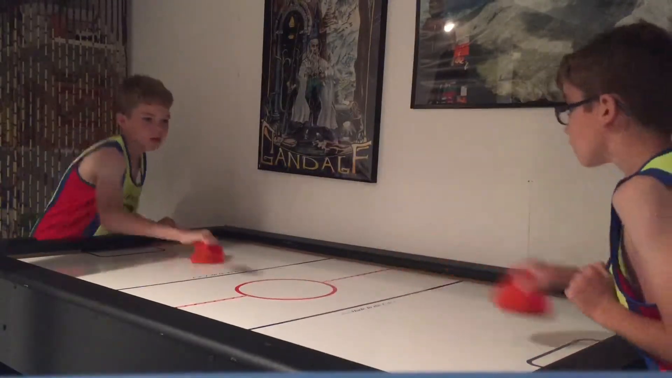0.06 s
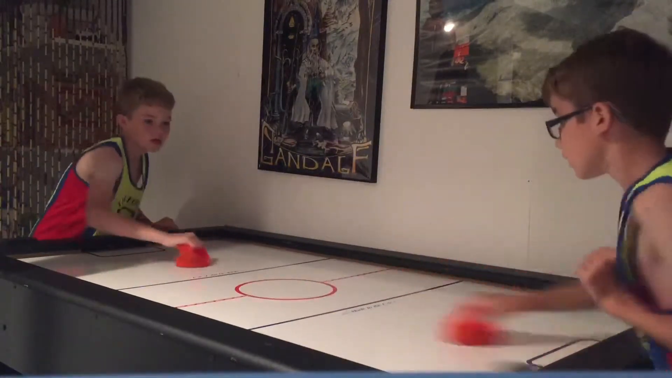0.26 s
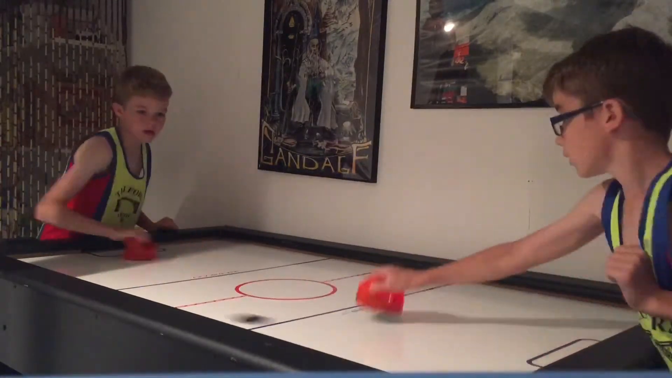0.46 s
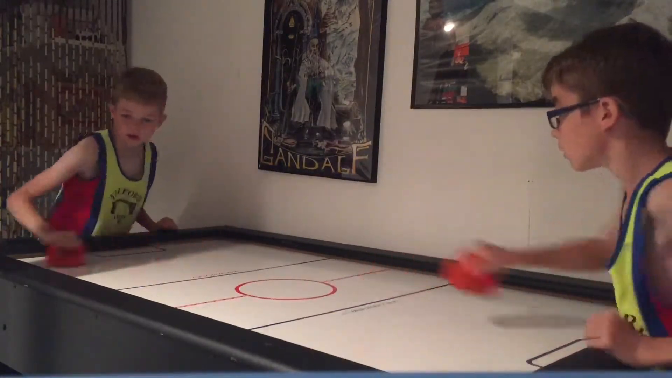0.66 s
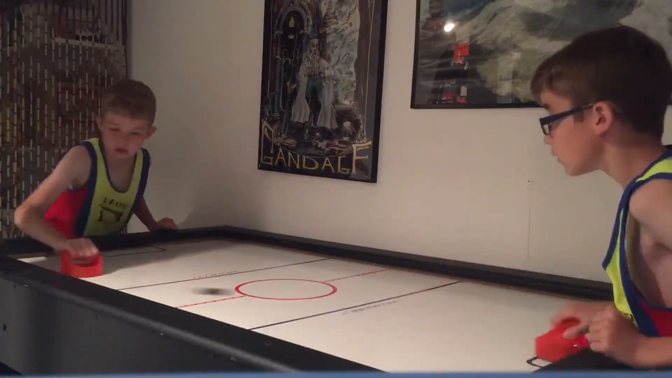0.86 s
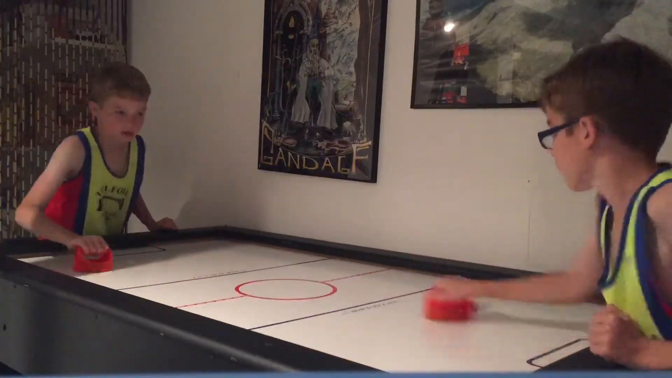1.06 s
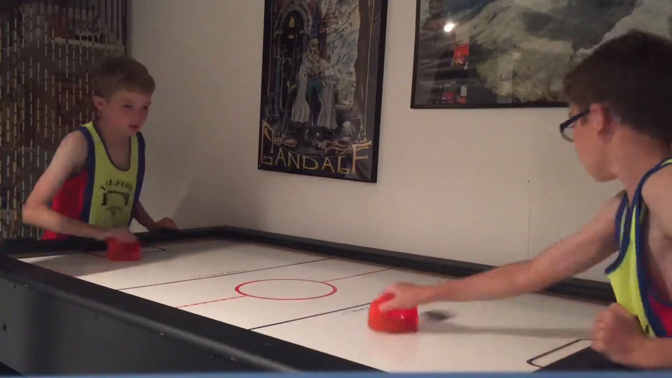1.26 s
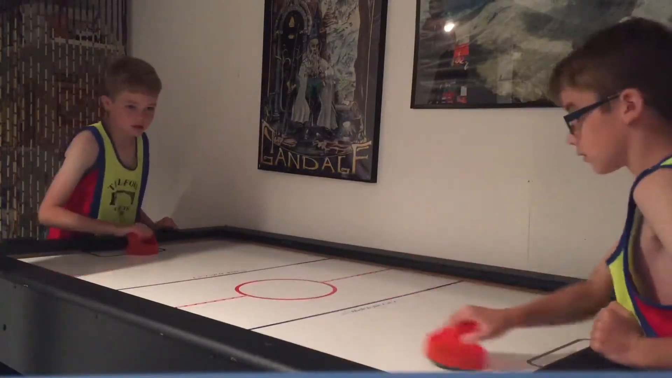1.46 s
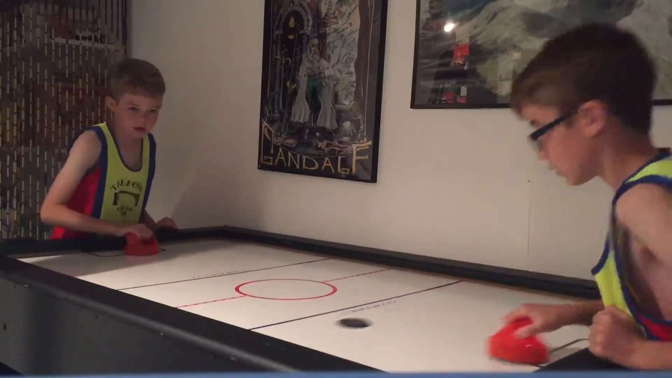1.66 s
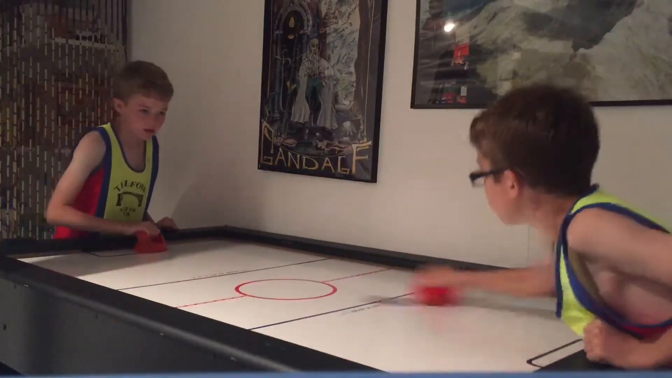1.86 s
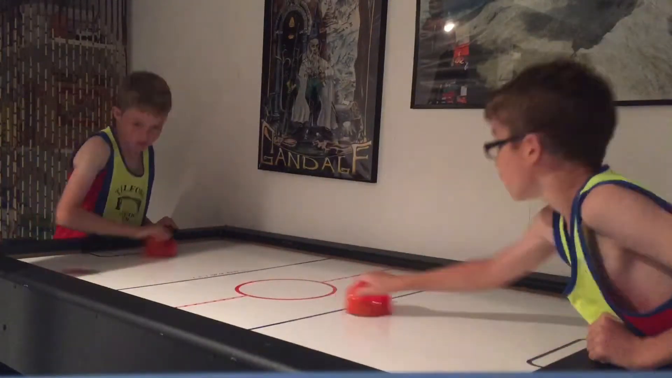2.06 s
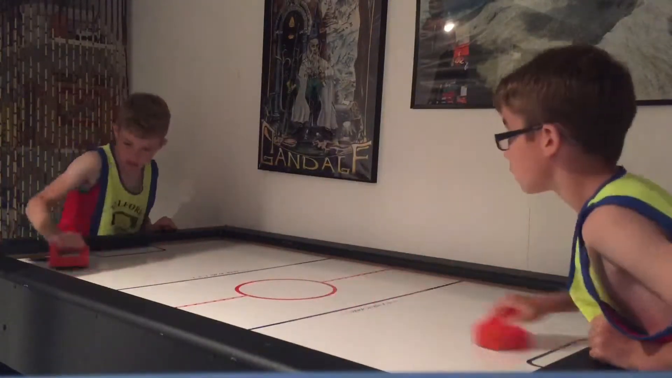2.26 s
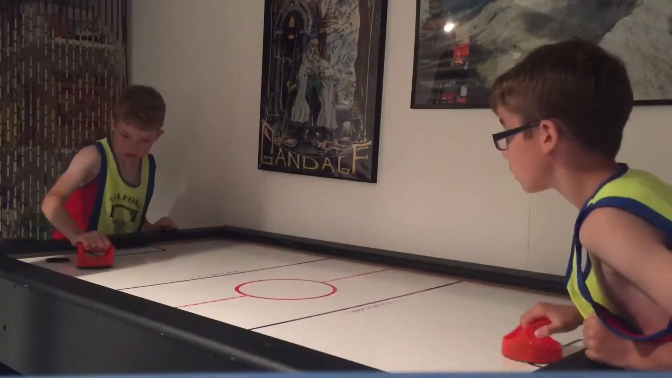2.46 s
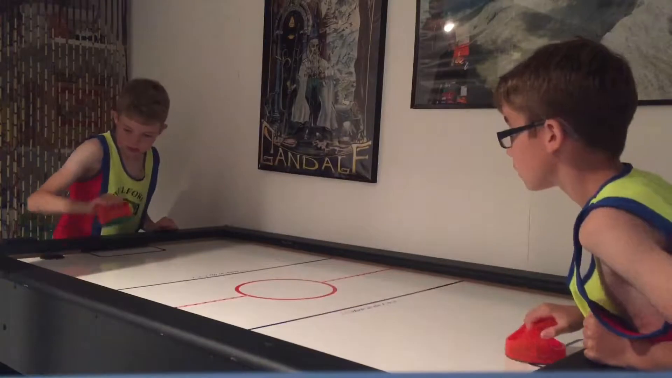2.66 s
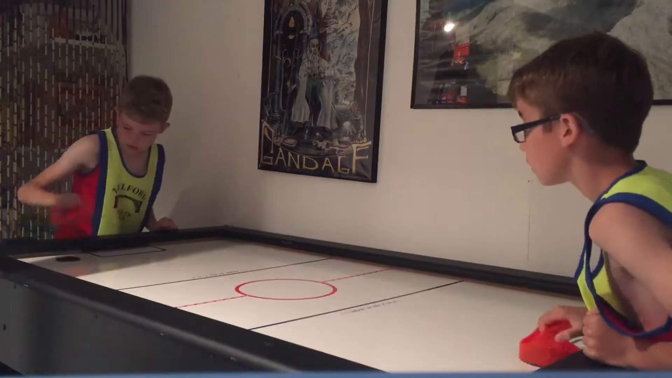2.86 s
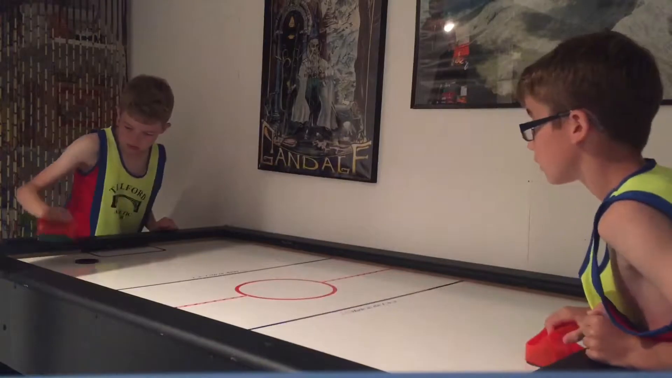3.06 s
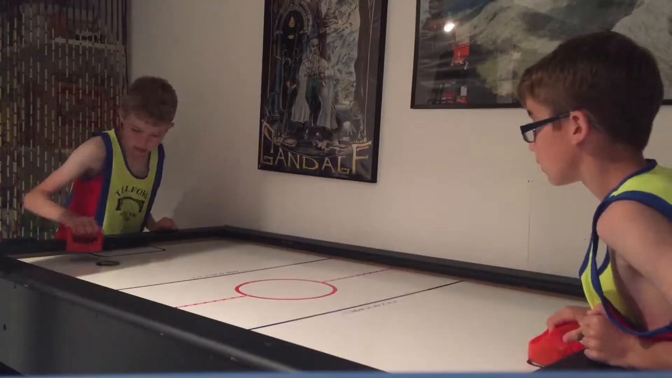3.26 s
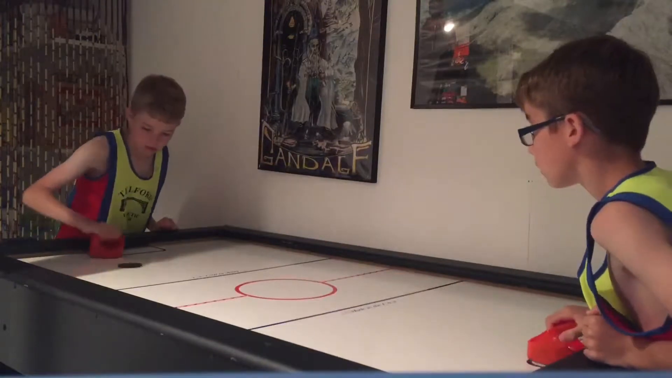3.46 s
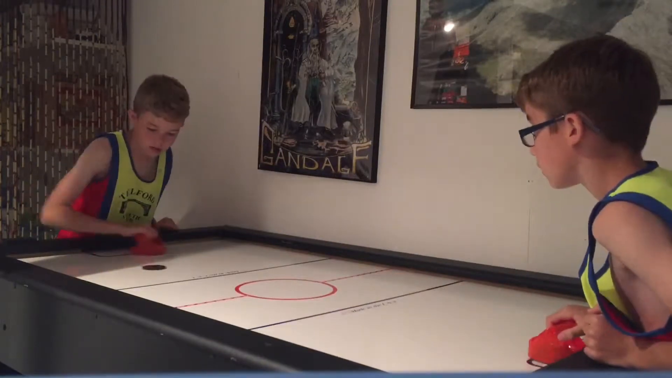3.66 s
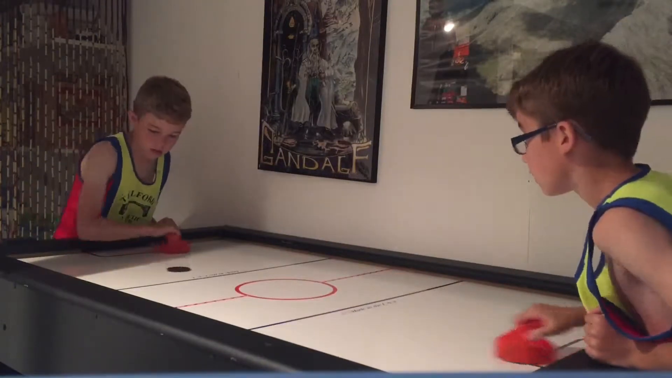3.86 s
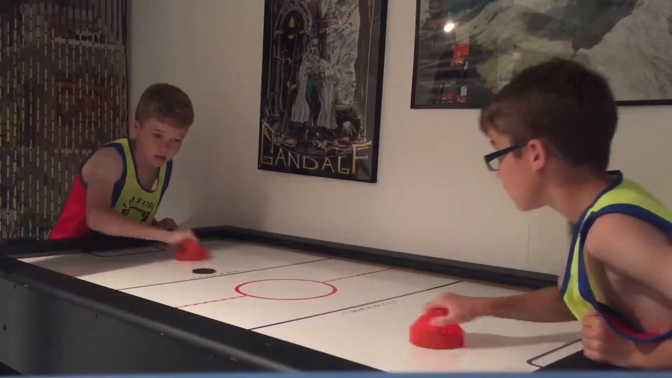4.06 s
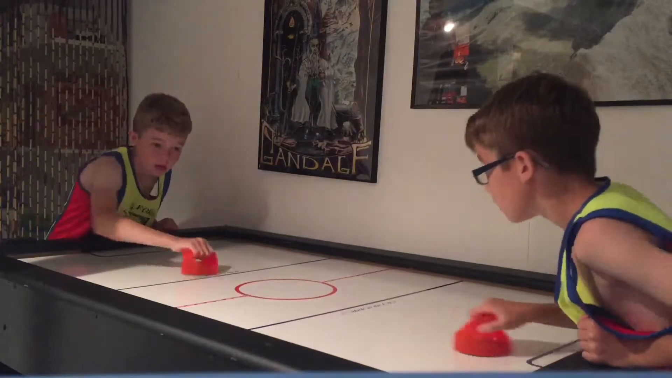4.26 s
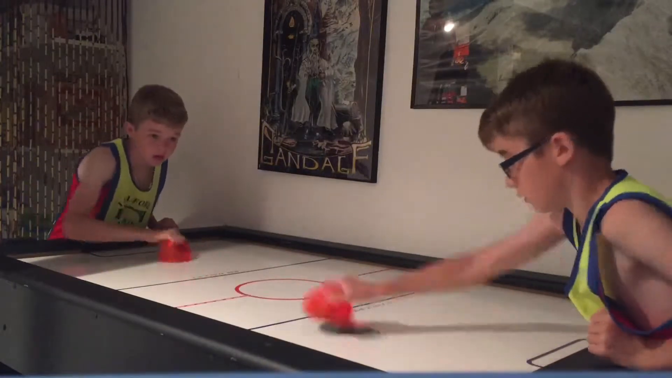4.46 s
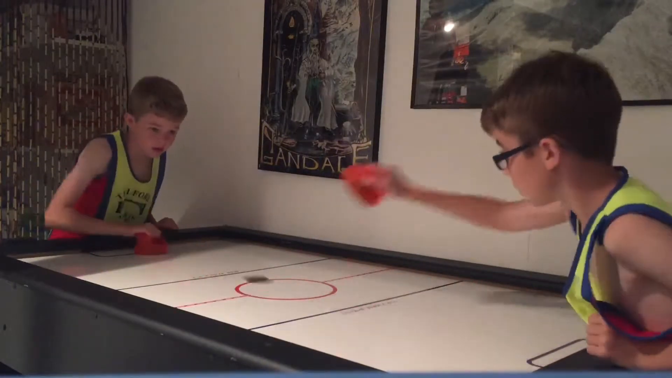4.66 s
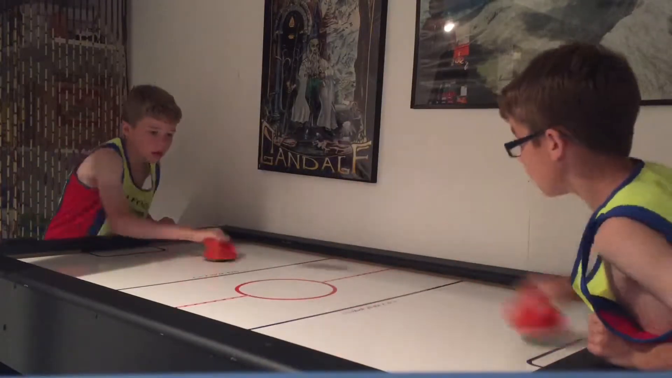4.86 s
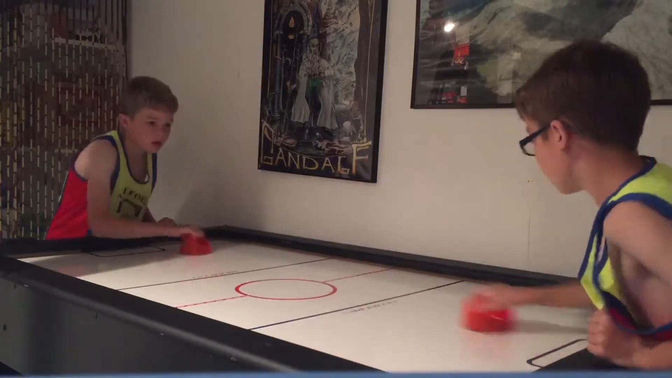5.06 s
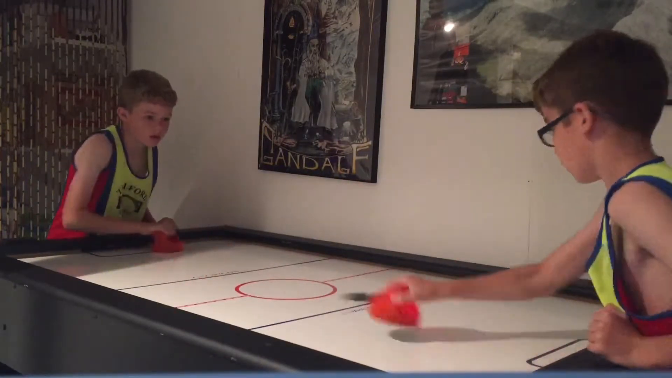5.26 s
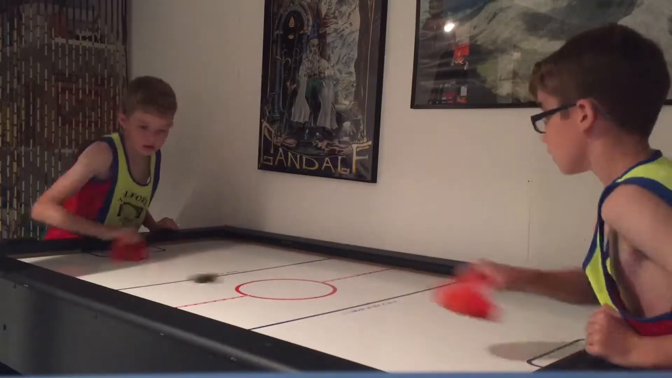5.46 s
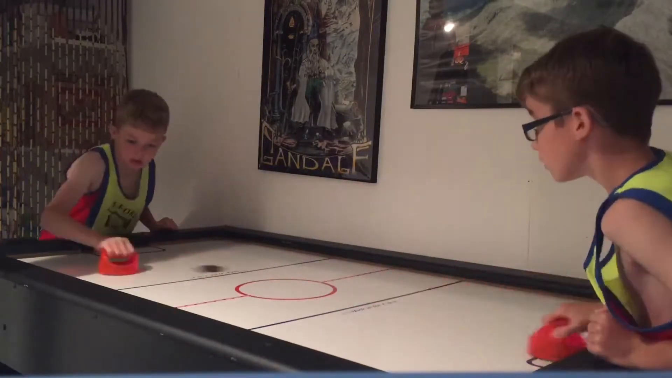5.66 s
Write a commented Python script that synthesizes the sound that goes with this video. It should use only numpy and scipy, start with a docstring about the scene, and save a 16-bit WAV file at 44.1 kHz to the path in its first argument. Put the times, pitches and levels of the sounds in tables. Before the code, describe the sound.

Fast air hockey rally: bright plastic cracks and duller rail clacks over steady blower rush, a quieter pause, then a second burst with close clatter.

```python
"""The fading tail of a rail clack opens the scene; then bright cracks of mallet on puck alternate with
duller clacks of the air hockey puck off the rails. The puck rattles lightly in the goal and is served
again after a pause. The hollow table top thumps, the near mallet ticks and rings close by, and plastic
hisses faintly over the laminate. All contacts are noise shaped by spectra and damped modes, heard from
beside the table in a hard-walled room at home, over the blower's shaped noise and wavering tones."""
import sys
import numpy as np
from scipy import signal
from scipy.fft import rfft, irfft
from scipy.io import wavfile
from scipy.ndimage import uniform_filter1d

SR = 44100
rng = np.random.default_rng(int(sys.argv[2]) if len(sys.argv) > 2 else 0)


def generate_wav(signal):
    """Clip the signal to [-1, 1] and save it as 16-bit WAV at the path in sys.argv[1]."""
    frames = np.transpose(np.atleast_2d(signal))
    scaled = np.clip(frames, -1, 1) * 32767
    pcm = np.round(scaled).astype(np.int16)
    wavfile.write(sys.argv[1], SR, pcm)


N = 251804

# Bright plastic hits: mallet on puck, and light rattles of the puck in the goal. Each row: start in
# seconds, strength in dB, brightness in dB, cabinet knock in dB over the table's drumming.
BRIGHT_HITS = [ (0.105, -15.5, -2.5, -13), (0.791, -15.5, -2, 3), (1.128, -25, -9.5, 3.5),
               (1.921, -23, -2, 8), (2.266, -25.5, 2.5, -1), (2.412, -30, -5, -14), (3.703, -69, -5, -2),
               (4.185, -20, 0.5, -11), (4.8795, -14.5, -2.5, -8.5), (4.985, -25, -3, 4.5)]
# The puck meets rails and goal. Each row: start in seconds (negative: only the tail is heard),
# strength in dB, fullness in dB, direct path in dB.
RAIL_HITS = [ (-0.300, -19, 10, 0), (0.3198, -12.5, 1.5, -1), (0.771, -29.5, 12, -23),
             (1.188, -13, 2.5, 1.5), (1.541, -18.5, 2.5, 0.5), (2.198, -19, -1, 0), (2.208, -15, -5, -1.5),
             (2.3189, -21, -1.5, 1), (2.698, -42, 8, 2.5), (4.347, -17.5, 5, -21), (4.401, -15, -3, 0),
             (5.107, -15, 2.5, -7)]
# A mallet is set down on the table top. Each row: start in seconds, low drumming in dB,
# cabinet knock in dB over the drumming.
LANDINGS = [(0.219, -25, -10), (0.83, -26.5, 5.5), (3.45, -48, -13), (3.69, -45, -6), (4.966, -25.5, 4),
            (5.628, -23.5, -1.5), (5.658, -25, 5.5)]
# The near mallet clatters and rings. Each row: start in seconds, strength in dB, brightness in dB.
CLATTERS = [(1.129, -27, -13.5), (4.982, -22.5, -25), (5.079, -35, -1), (5.086, -26, -10),
            (5.108, -14, -10.5), (5.222, -38.5, 5.5), (5.449, -31.5, -11), (5.561, -31, -7),
            (5.656, -20.5, -7.5)]
# Strokes of a mallet over the table top. Each row: time of full speed in seconds, level in dB.
STROKES = [(0.1, -54.5), (4.15, -57.5), (5.2, -30), (5.48, -39)]

# Relative spectra of what each contact radiates. Each row: frequency in Hz, density in dB per Hz.
BRIGHT_COLOUR = [(60, -17), (300, -20), (700, -13), (1050, -6), (1500, -4.5), (2100, -4), (2700, -5),
                 (3600, -5.5), (4800, -12), (6600, -9), (8200, -15.5), (10000, -11.5), (12000, -15),
                 (15500, -15)]
RAIL_COLOUR = [(50, -45), (130, -32), (250, -16), (420, -8.5), (640, 0), (850, -3.5), (1500, -4),
               (2300, -2), (3000, -8), (3900, -17.5), (5000, -26), (6600, -29), (8500, -31.5), (15500, -39)]
THUMP_COLOUR = [(30, -59.5), (50, -21), (75, 7.5), (125, -3), (180, 7), (370, 0.5), (620, -14),
                (1200, -25.5), (4000, -42)]
KNOCK_COLOUR = [(60, -35.5), (200, -3), (340, 1.5), (630, -2.5), (900, -4), (1500, -13.5), (4000, -35)]
SCUFF_COLOUR = [(300, -24), (1500, -2), (3900, -6), (4800, -1), (6500, 1.5), (8000, -9.5), (10600, -2),
                (12000, -18.5), (15500, -7)]
# Relative spectrum of the blower's rushing air. Each row: frequency in Hz, density in dB per Hz.
AIR_RUSH_COLOUR = [(25, -38), (45, -19.5), (65, -5.5), (105, -4.5), (135, -18), (180, -8.5), (260, -15),
                   (500, -7), (900, -2.5), (1250, -13), (3000, -19), (5000, -33), (10000, -43),
                   (16000, -62.5)]
# Blower motor and fan. Each row: frequency in Hz, level in dB rms.
MOTOR_HUM = [(103, -56), (311, -64), (362, -59), (572, -58), (694, -56.5), (851, -54), (940, -54.5)]

# Hard plastic of puck and mallets. Each row: frequency in Hz, width in Hz,
# level in dB relative to the broad clack.
PLASTIC_MODES = [(1060, 45, -3), (2140, 50, -2), (2700, 60, -7), (3200, 90, -5), (3840, 70, 2),
                 (6480, 120, 4), (6950, 80, -1), (9780, 160, 4), (9980, 60, 2), (13400, 260, 2),
                 (14950, 300, 2)]
# Hollow cup of the near mallet. Each row: frequency in Hz, width in Hz, relative level in dB.
CUP_MODES = [(1715, 45, -10), (2850, 90, -15), (3390, 50, -14), (3800, 60, 1), (6490, 90, -8),
             (6880, 70, -18), (9450, 170, -22), (9750, 150, -21), (10680, 110, -20), (13250, 170, -26),
             (14850, 250, -28)]
# Hollow table top. Each row: frequency in Hz, relative level in dB, 60 dB decay time in seconds.
TABLE_MODES = [(65.4, -9.5, 0.47), (83.2, -12, 0.65), (161, -9, 0.85), (195.5, -1.5, 0.46),
               (237.4, -11, 0.6), (306, -3.5, 0.5), (363, 0, 0.28), (455.3, -4, 0.22), (610, -20, 1)]
# The room. Each row: frequency in Hz, 60 dB decay time in seconds.
ROOM_T60 = [(80, 0.72), (200, 0.77), (530, 0.79), (1400, 0.88), (3500, 0.95), (6500, 0.72), (10000, 0.57),
            (15000, 0.32)]

# Every bright hit also drives the table top, a hard one far more than a light one.
FULL_HIT_DB, FULL_DRUM_DB = -15.5, -21
DRUM_GROWTH = 1.26  # dB of drumming per dB of hit
DRUM_LAG_S = 0.006
# A fast puck gives the full treble; below that strength the contact is longer and duller.
FAST_PUCK_DB, FAST_TREBLE_DB = -18.5, 4.5
DULLING = 2.1  # dB of treble setting lost per dB of strength
CLATTER_DIRECT_DB = 11  # close by, so the direct path leads the room
STROKE_RISE_DB_PER_S, STROKE_FALL_DB_PER_S = 74, 54
RUSH_DB = -42.5  # dB rms
CUTOFF_HZ = 15800

LENGTH = 2 ** 16  # samples in one contact with its room tail
AGE = np.arange(LENGTH) / SR  # seconds since the contact
HZ = np.maximum(np.arange(LENGTH // 2 + 1) * SR / LENGTH, 1)


def bright_hits(crack_db=10.5, crack_treble_db=0.5):
    """Plastic struck hard or rattled lightly: a short, bright crack rings its modes and then the room."""
    out = np.zeros(N)
    ring = plastic(PLASTIC_MODES)
    body = rms_one(causal(at_hz(BRIGHT_COLOUR, HZ)))
    crack = from_db(crack_db) * treble(crack_treble_db)
    tails = room_tails(len(BRIGHT_HITS))
    for (s, db, bright_db, _), tail in zip(BRIGHT_HITS, tails):
        early = first_arrivals(direct=4.0, swell_s=0.0053, spread_s=0.0015, linger_db=-3, linger_s=0.0039)
        colour = body * (1 + ring) * treble(bright_db) * grain(depth_db=1.0, width_hz=60)
        add(out, s, from_db(db) * irfft(colour * (crack * early + tail)))
    return out


def rails(knock_db=3.0, knock_treble_db=0.0):
    """The puck knocks on rails and goal: a duller, fuller clack, duller still when the puck is slow."""
    out = np.zeros(N)
    ring = 0.7 * plastic(PLASTIC_MODES)
    body = rms_one(causal(at_hz(RAIL_COLOUR, HZ)) * (1 + ring))
    knock = from_db(knock_db) * treble(knock_treble_db)
    tails = room_tails(len(RAIL_HITS))
    for (s, db, full_db, direct_db), tail in zip(RAIL_HITS, tails):
        bright_db = FAST_TREBLE_DB - DULLING * max(FAST_PUCK_DB - db, 0)
        early = first_arrivals(direct=9.0, swell_s=0.0039, spread_s=0.0031, linger_db=-4, linger_s=0.05)
        colour = body * bass(full_db) * treble(bright_db) * grain(depth_db=1.5, width_hz=55)
        near_sound = from_db(direct_db) * knock * early
        add(out, s, from_db(db) * irfft(colour * (near_sound + tail)))
    return out


def table_top(boom_db=-0.5, punch_db=0.0):
    """Bright hits and landing mallets make the hollow top drum, the cabinet knock and the room boom."""
    out = np.zeros(N)
    boom = from_db(boom_db) * rms_one(causal(at_hz(THUMP_COLOUR, HZ)))
    wood = rms_one(causal(at_hz(KNOCK_COLOUR, HZ)))
    blows = list(LANDINGS)
    for s, db, _, knock_db in BRIGHT_HITS:
        drum_db = FULL_DRUM_DB + DRUM_GROWTH * (db - FULL_HIT_DB)
        blows.append((s + DRUM_LAG_S, drum_db, knock_db))
    for (s, drum_db, knock_db), tail in zip(blows, room_tails(len(blows))):
        early = first_arrivals(direct=9.4, swell_s=0.0054, spread_s=0.0012, linger_db=-9, linger_s=0.038)
        cabinet = boom + from_db(knock_db) * wood * grain(depth_db=3.5, width_hz=28)
        knock = irfft(cabinet * (from_db(punch_db) * early + tail))
        add(out, s, from_db(drum_db) * (table_thump() + knock))
    return out


def table_thump(modes_db=-2.0, scatter_db=4.0):
    """The top drums in its low modes, with random strengths and signs for the place of the blow."""
    out = 0
    for hz, db, t60 in TABLE_MODES:
        level_db = modes_db + db + scatter_db * rng.standard_normal()
        strength = from_db(level_db) * rng.choice([-1, 1])
        out = out + strength * np.sin(2 * np.pi * hz * AGE) * from_db(-60 * AGE / t60)
    return out * (1 - np.exp(-AGE / 0.0018))  # soft onset


def near_mallet(tick_db=-4.5):
    """The hollow cup is jolted and rocks on its rim; each touch is a tick and a ring."""
    out = np.zeros(N)
    cup = rms_one(plastic(CUP_MODES))
    tick = from_db(tick_db) * rms_one(causal(at_hz(SCUFF_COLOUR, HZ)))
    for (s, db, bright_db), tail in zip(CLATTERS, room_tails(len(CLATTERS))):
        early = first_arrivals(direct=2.3, swell_s=0.0033, spread_s=0.00067, linger_db=-5.5, linger_s=0.023)
        colour = (cup + tick) * treble(bright_db)
        add(out, s, from_db(db) * irfft(colour * (from_db(CLATTER_DIRECT_DB) * early + tail)))
    return out


def scuffing():
    """Plastic slides on the laminate: a slightly uneven hiss swells and fades with each stroke."""
    hiss = rms_one(shaped_noise(from_db(at_hz(SCUFF_COLOUR, scene_hz()))))
    catches_db = rms_one(uniform_filter1d(rng.standard_normal(N), size=600))
    t = np.arange(N) / SR
    strokes_db = []
    for s, db in STROKES:
        drop_db = np.maximum(STROKE_RISE_DB_PER_S * (s - t), STROKE_FALL_DB_PER_S * (t - s))
        strokes_db.append(db - drop_db)
    return hiss * from_db(np.max(strokes_db, axis=0) + catches_db)


def blower(whistle_hz=8030, whistle_width_hz=110, whistle_db=-71, waver_hz=0.61):
    """Air rushes through the table, motor and fan hum, and the air holes whistle faintly."""
    hz = scene_hz()
    rush = rms_one(shaped_noise(from_db(at_hz(AIR_RUSH_COLOUR, hz))))
    # the resonance applied twice makes the whistle narrower
    whistle = rms_one(shaped_noise(resonance(hz, whistle_hz, whistle_width_hz) ** 2))
    hum = 0
    for line_hz, db in MOTOR_HUM:
        waver = waver_hz * rms_one(uniform_filter1d(rng.standard_normal(N), size=4000))
        phase = 2 * np.pi * np.cumsum(line_hz + waver) / SR
        hum = hum + from_db(db) * np.sqrt(2) * np.sin(phase)
    return from_db(RUSH_DB) * rush + from_db(whistle_db) * whistle + hum


def first_arrivals(direct, swell_s, spread_s, linger_db, linger_s):
    """The direct click and a dense cluster off table top, rails and nearest wall; as a spectrum."""
    swell = np.exp(-0.5 * ((AGE - swell_s) / spread_s) ** 2)
    linger = from_db(linger_db) * np.exp(-AGE / linger_s)
    arrivals = (swell + linger) * rng.standard_normal(LENGTH)
    arrivals[int(0.0005 * SR)] += direct
    return rfft(arrivals)


def room_tails(count):
    """A diffuse decay for each place on the table, every band dying at its own rate; as spectra."""
    white = rfft(rng.standard_normal((count, LENGTH)))
    tails = 0
    for k, (_, t60) in enumerate(ROOM_T60):
        # overlapping bands: full at this row, none at its neighbours
        points = [(hz, float(j == k)) for j, (hz, _) in enumerate(ROOM_T60)]
        tails = tails + irfft(white * at_hz(points, HZ)) * from_db(-60 * AGE / t60)
    return rfft(tails * (1 - np.exp(-AGE / 0.00069)))  # soft onset


def plastic(modes):
    """A plastic body rings in many narrow damped modes."""
    return sum(from_db(db) * resonance(HZ, hz, width) for hz, width, db in modes)


def resonance(hz, centre_hz, width_hz):
    """Response of one damped mode, gain 1 at its centre."""
    return 1j * hz * width_hz / (centre_hz ** 2 - hz ** 2 + 1j * hz * width_hz)


def grain(depth_db, width_hz):
    """Each place of contact favours other modes of the table's many: a ripple on the spectrum."""
    knots = np.arange(0, SR / 2, max(width_hz, 20))
    ripple = rng.standard_normal(2048)[:len(knots)]
    return rms_one(causal(depth_db * np.interp(HZ, knots, ripple)))


def treble(db, corner_hz=4300):
    """A high shelf: harder contacts put more into the top."""
    return causal(db * HZ ** 4 / (HZ ** 4 + corner_hz ** 4))


def bass(db, corner_hz=650):
    """A low shelf: some stretches of rail give more body than others."""
    return causal(db * corner_hz ** 4 / (HZ ** 4 + corner_hz ** 4))


def causal(db):
    """Minimum-phase response with these levels: nothing sounds before the blow."""
    cepstrum = irfft(np.log(from_db(db)))
    cepstrum[1:LENGTH // 2] *= 2
    cepstrum[LENGTH // 2 + 1:] = 0
    return np.exp(rfft(cepstrum))


def scene_hz():
    """Frequencies of a spectrum as long as the whole scene, kept above zero for the log axis."""
    return np.maximum(np.arange(N // 2 + 1) * SR / N, 1)


def shaped_noise(response):
    """White noise through a response, for sounds that last the whole scene."""
    return irfft(rfft(rng.standard_normal(N)) * response, N)


def at_hz(points, hz):
    """Read a table on a log-frequency axis."""
    where, value = np.transpose(points)
    return np.interp(np.log(hz), np.log(where), value)


def from_db(db):
    """Decibels to gain."""
    return 10 ** (np.asarray(db) / 20)


def rms_one(x):
    """Scale to unit power."""
    return x / np.sqrt(np.mean(np.abs(x) ** 2))


def add(track, s, sound):
    """Mix a sound in at a time; one that began earlier leaves its tail."""
    start = int(round(s * SR))
    sound, start = sound[max(-start, 0):], max(start, 0)
    track[start:start + len(sound)] += sound[:N - start]


def scene():
    """The rallies over the blower, heard from beside the table, in one channel."""
    contacts = bright_hits() + rails() + table_top() + near_mallet()
    return (contacts + scuffing() + blower())[None]


def record(dry, ceiling=1.0):
    """The microphone signal: the loudest peaks are rounded off and the top is cut."""
    rounded = dry / (1 + (dry / ceiling) ** 4) ** (1 / 4)
    top_cut = signal.ellip(10, 0.1, 70, CUTOFF_HZ, fs=SR, output="sos")
    return signal.sosfilt(top_cut, rounded)


dry = scene()
out = record(dry)
generate_wav(out)
```